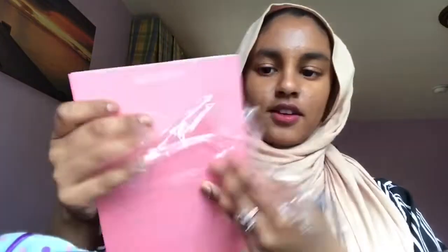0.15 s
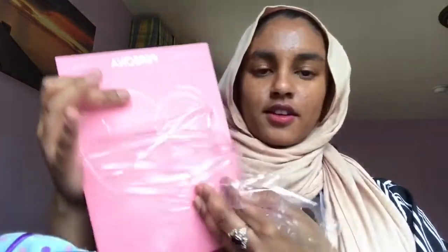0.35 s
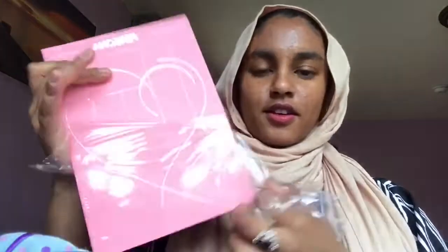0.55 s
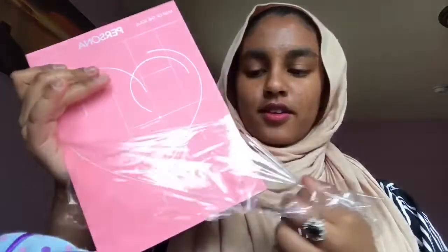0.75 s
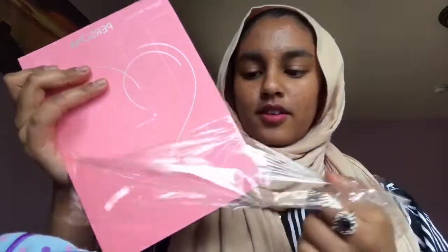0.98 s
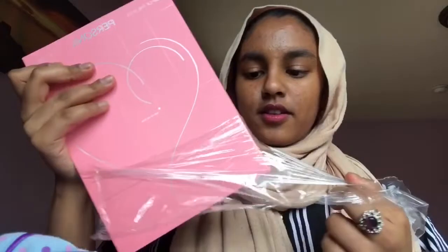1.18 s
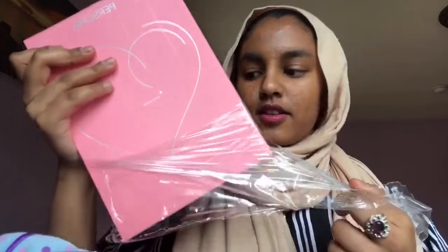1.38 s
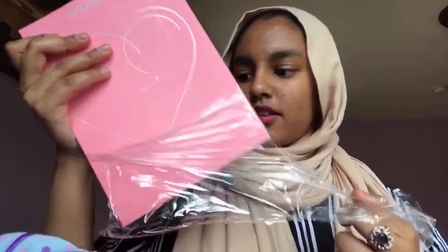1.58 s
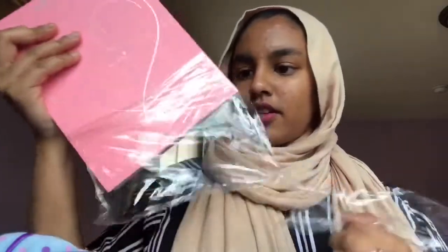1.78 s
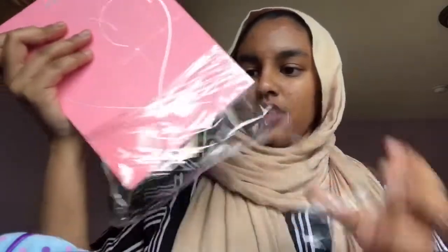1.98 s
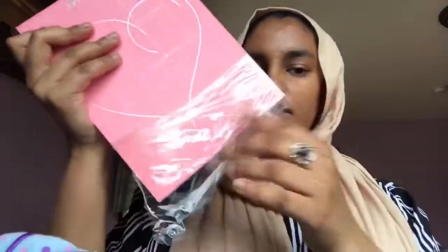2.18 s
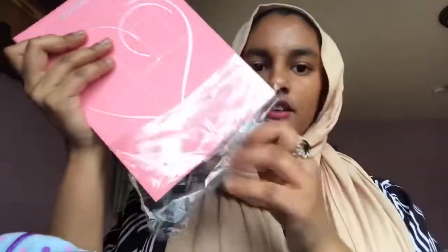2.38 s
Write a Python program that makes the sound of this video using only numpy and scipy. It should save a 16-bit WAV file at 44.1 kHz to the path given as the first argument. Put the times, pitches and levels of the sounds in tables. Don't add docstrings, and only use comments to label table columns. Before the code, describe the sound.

Plastic wrap being pulled from a card box, sharp crinkly snaps and fine crackle, close indoors

```python
import sys
import numpy as np
from scipy import signal
from scipy.fft import rfft, irfft
from scipy.io import wavfile
from scipy.ndimage import uniform_filter1d

SR = 44100
rng = np.random.default_rng(int(sys.argv[2]) if len(sys.argv) > 2 else 0)


def transcribe(signal):
    frames = np.atleast_2d(signal).T
    limited = np.clip(frames, -1, 1)
    pcm = np.round(limited * 32767).astype(np.int16)
    wavfile.write(sys.argv[1], SR, pcm)


def makeup_ratio(level_db):
    decades = np.asarray(level_db, float) / 20
    return 10 ** decades


N = 108045

SHIVER_S = 0.002


def evened(x):
    return x / np.sqrt(np.mean(x ** 2) + 1e-20)


def read(points, hz):
    point_hz, value = np.transpose(points)
    return np.interp(np.log(hz + 1), np.log(point_hz + 1), value)


def curve(table, column=1):
    rows = np.array(table)
    return np.interp(np.arange(N) / SR, rows[:, 0], rows[:, column])


def colour(x, points):
    hz = np.fft.rfftfreq(len(x), 1 / SR)
    return irfft(rfft(x) * makeup_ratio(read(points, hz)), len(x))


def resonate(x, hz, width_hz):
    turn = np.exp(2j * np.pi * np.cumsum(hz * np.ones(len(x))) / SR)
    r = np.exp(-np.pi * width_hz / SR)
    return 2 * (turn * signal.lfilter([1 - r], [1, -r], x / turn)).real


def drift(rate_hz):
    noise = rng.standard_normal(N + SR)
    pole = np.exp(-2 * np.pi * rate_hz / SR)
    return evened(signal.lfilter([1], [1, -pole], noise)[SR:])


def add(mix, start_s, sound):
    part = mix[round(start_s * SR):][:len(sound)]
    part += sound[:len(part)]


def slip_clock():
    t = np.arange(-.008, .03, 1 / SR)
    jump = 1. * (np.abs(t) == np.abs(t).min())
    return t, jump


def buckle(mix, at_s, rasp_db, rasp_s, sent_db, patch):
    t, jump = slip_clock()
    ring = np.zeros(len(t))
    for hz, width_hz, db in patch:
        late = np.roll(jump, round(.25 * SR / hz))
        ring += makeup_ratio(db) * resonate(resonate(late, hz, width_hz), hz, width_hz)

    lead = np.where(t < 0, 0.3, 1)
    shape = np.exp(-abs(t) / lead / rasp_s)
    shape += (t > 0) * makeup_ratio(-30) * np.exp(-abs(t) / SHIVER_S)
    bright = signal.butter(2, 2 * 3000 / SR, "high")
    rasp = signal.lfilter(*bright, rng.standard_normal(len(t))) * shape * makeup_ratio(rasp_db)
    near = ring + rasp
    add(mix[0], at_s + t[0], near)

    blurred = np.sqrt(abs(uniform_filter1d(abs(rfft(near)) ** 2, size=70)))
    add(mix[1], at_s + t[0], makeup_ratio(sent_db) * np.roll(irfft(blurred, len(t)), jump.argmax()))


def buckles(mix):
    # at_s, rasp_db, rasp_s, sent_to_walls_db
    events = [(0.1466, -61, 0.00081, -2), (0.2237, -23.5, .0004, 3), (0.272, -17.5, 0.00035, 0.5),
              (0.4575, -37, 0.0018, 6), (.8147, -35, 0.003, -6), (1.0366, -36, 0.0016, -4),
              (1.601, -26.5, 0.00043, -3.5), (1.6714, -17.5, 0.00016, -4), (1.977, -32, 0.0012, -10),
              (2.1436, -6.5, 0.00029, -2.5)]
    # pitch_hz, width_hz, level_db
    patches = [
        [(776, 330, -5.5), (1130, 270, -2.5), (2750, 760, -17.5), (3150, 880, -14)],
        [(820, 570, 3.5), (1460, 480, 5), (3880, 1200, -2), (8450, 2500, -10.5)],
        [(730, 560, 0), (1250, 460, 3.5), (2700, 1400, 3.5), (3650, 610, 7), (7500, 1600, -1),
         (14800, 1700, -6)],
        [(1280, 340, -11), (1810, 720, -15), (3580, 1200, -15), (14900, 1500, -16)],
        [(1140, 320, -11.5), (2700, 1200, -9), (5500, 1500, -10.5), (7500, 1000, -19)],
        [(620, 940, -5), (1070, 420, -16), (2200, 980, -12), (3150, 580, -19)],
        [(615, 420, 4), (1023, 330, 6), (2900, 650, -5), (4070, 1100, -11), (6500, 2900, -9.5)],
        [(740, 560, -2.5), (1120, 450, -0.5), (2070, 310, -3.5), (3500, 1500, -5.5), (7000, 3500, -2),
         (12000, 2200, -20)],
        [(685, 480, -4), (1990, 760, -10), (4640, 630, -3), (7060, 1700, -13.5), (11240, 1200, -13),
         (14500, 1200, -7)],
        [(910, 230, 13), (1330, 760, 15.5), (1810, 240, 5.5), (3500, 370, 3), (4460, 2100, 10.5),
         (5920, 590, 11), (8000, 2450, 7.5)],
    ]
    for event, patch in zip(events, patches):
        buckle(mix, *event, patch)


def voice(slips, box_db, box_hz, film_hz, flat_db):
    def ring(hz, width_hz):
        return evened(resonate(resonate(slips, hz, width_hz), hz, 3.1 * width_hz))

    film_width_hz, box_width_hz = 3200, 840
    film = ring(film_hz, film_width_hz) + makeup_ratio(flat_db) * evened(slips)
    film = film + makeup_ratio(-19) * ring(min(1.75 * film_hz, 15000), film_width_hz)
    box = ring(box_hz, box_width_hz)
    return film / abs(film).max() + makeup_ratio(box_db + 2.5) * box / abs(box).max()


def snap(mix, at_s, peak_db, box_db, box_hz, film_hz, small=False):
    t, jump = slip_clock()
    sharp_flat_db = -4
    spread, jump_size, flat_db = (4.0, .55, -5) if small else (1, 1, sharp_flat_db)
    rise_s, fall_s, lag_s = .00028, .00022, .0017

    shape = 0.69 * np.exp(-abs(t) / np.where(t < 0, rise_s, fall_s) / spread)
    shape = shape + (t > 0) * makeup_ratio(-16.5) * np.exp(-abs(t) / SHIVER_S)
    slips = shape * rng.standard_normal(len(t)) + jump_size * jump
    near = voice(slips, box_db, box_hz, film_hz, flat_db)
    near = makeup_ratio(peak_db) * near / abs(near).max()

    sent = makeup_ratio(-4.5 * np.log2(film_hz / 4600)) * near.std()
    start_s = max(at_s + lag_s + t[0], 0)
    add(mix[0], start_s, near)
    add(mix[1], start_s, sent * evened(voice(jump, box_db, box_hz, film_hz, sharp_flat_db)))


def creases(mix):
    # at_s, peak_db, box_share_db, box_pitch_hz, film_pitch_hz
    bright_tuft = [(1.031, -28, -7.5, 660, 8950)]
    # at_s, peak_db, box_share_db, film_pitch_hz
    small_creases = [(.006, -38.5, -9, 3000), (0.022, -44, -38, 6500), (0.0427, -40.5, -40, 3240),
                     (0.05, -40.5, -21, 2470), (.059, -44, -19, 4240), (.088, -44, -8, 2980),
                     (0.0485, -40, 10, 2690), (0.1267, -46, 5, 2790), (0.193, -39, 10, 2180),
            (0.2285, -48, -7, 2700), (0.4977, -41, -38, 4500), (0.5595, -34, -39, 3880),
            (0.5842, -35.5, -8.5, 3900), (0.6443, -38.5, -42, 8450), (0.673, -41, -21, 2370),
            (0.7226, -49, -28, 2290), (0.771, -35, -38, 8100), (0.7918, -39, -37, 3070),
            (0.84, -49, -13, 2440), (0.852, -32, -9.5, 10300), (0.9166, -59, -18, 2630),
            (0.939, -39.5, -27, 5900), (0.9585, -38, -18, 2270), (0.975, -39, -12, 2680),
            (1.0088, -35, -5, 3000), (1.1046, -40.5, -26, 2060), (1.1276, -34.5, -12, 2340),
            (1.1388, -38.5, 2, 4900), (1.1465, -36, -12, 2000),
                     (.2045, -43, -22, 6000), (.2115, -41, -12, 2300), (.2472, -38, -20, 4000),
              (1.0154, -34, -10, 2500), (1.567, -39, -26, 7500), (1.5855, -37, -18, 4000),
              (1.6447, -38, -20, 7700), (1.956, -43, -10, 2500), (2.1036, -40, -22, 7000),
              (2.1196, -36, -10, 4600),
                     (1.262, -41, -2, 5500), (1.321, -42, -18, 6700), (1.3961, -42.5, -11, 2460),
            (1.4668, -45, -17, 8760), (1.4755, -44, -12, 7500), (1.553, -42, -26, 2360),
            (1.5614, -39.5, -20, 7360), (1.7243, -38, -10.5, 4480), (1.7996, -44, -18, 3200),
            (1.934, -69, -2, 2440), (2.07, -45.5, -5, 2810), (2.2287, -39, -22, 6600),
            (2.2968, -43.5, -14, 2230), (2.4143, -48, -30, 6500)]
    # at_s, peak_db, box_share_db, film_pitch_hz
    ticks = [(0.2758, -23.5, -25, 5500), (0.4562, -39, -26, 9000), (0.4609, -36.5, -11, 3500),
             (0.6537, -44, -40, 8000), (.691, -37, -9, 7500), (0.949, -46, -8, 2600),
             (0.968, -44, -10, 2600), (0.994, -44, -17, 3000), (1.022, -33, -8, 2420),
             (1.043, -50, -8, 2600), (1.456, -45, -30, 3000), (1.52, -50, -40, 6500),
             (1.808, -40.5, -40, 5500), (1.858, -47, -13, 2450), (0.264, -31, -23, 7500),
             (1.011, -36, -10, 2900), (1.292, -38, 4, 2200), (1.908, -44, -4, 3500),
             (2.1365, -30, -11, 2500), (2.139, -29, -23, 7000)]
    box_hz = 1030
    for row in bright_tuft:
        snap(mix, *row, small=True)
    for at_s, peak_db, box_db, film_hz in small_creases:
        snap(mix, at_s, peak_db, box_db, box_hz, film_hz, small=True)
    for at_s, peak_db, box_db, film_hz in ticks:
        snap(mix, at_s, peak_db, box_db, box_hz, film_hz)


def crackle():
    # time_s, crackle_level_db
    pull = [(0, -57), (.07, -67), (.12, -66.5), (.19, -61), (.23, -50), (.46, -58.5), (.62, -58.5),
            (.8, -50.5), (.89, -54), (.96, -48.5), (1.04, -49.5), (1.07, -59.5), (1.15, -53.5),
            (1.42, -61.5), (1.62, -59.5), (1.9, -65), (2.1, -54), (2.33, -67)]
    # pitch_hz, level_db
    film_tone = [(300, -12.5), (1100, -7.5), (1600, -10), (2300, -8), (4000, -11.5), (9000, -10.5),
                 (15500, -10)]
    creases_per_s, spread_db, clump_db, grain_s = 1300, 3.2, 2.5, .0005

    size = makeup_ratio(spread_db * np.minimum(rng.exponential(1, N), 3.5) + clump_db * drift(41))
    size *= rng.random(N) < creases_per_s / SR
    size *= rng.choice([-1., 1.], N)
    patch = rng.integers(0, 32, N)
    t = np.arange(120) / SR
    out = np.zeros(N)
    for k, hz in enumerate(np.geomspace(700, 15000, num=32)):
        rasp = rng.standard_normal(len(t)) * np.exp(-t / grain_s)
        rasp = evened(resonate(rasp, hz, 2.5 * hz)) + makeup_ratio(10) * evened(rasp)
        out += signal.oaconvolve(size * (patch == k), rasp)[:N]
    return makeup_ratio(curve(pull) + 0.5) * evened(colour(out, film_tone))


def knocks(mix):
    # at_s, peak_db, pitch_hz
    bumps = [(0.226, -33, 310), (0.2303, -42, 1460), (0.961, -41.5, 530), (1.148, -45, 584),
             (1.2928, -36.5, 546), (1.9105, -42.5, 820), (1.978, -40.5, 307), (2.141, -28, 137),
             (2.146, -35.5, 310)]
    for at_s, peak_db, hz in bumps:
        turns = np.arange(0, .08, 1 / SR) * hz
        thud = makeup_ratio(peak_db) * np.sin(2 * np.pi * turns) * np.exp(-2 * turns / 2.75)
        add(mix.T, at_s, thud[:, None])


def room():
    # pitch_hz, t60_s
    decay = [(200, 0.33), (1000, 0.25), (4000, 0.22), (9000, 0.22), (16000, 0.27)]
    # delay_s, level_db
    echoes = [(.0016, -25.5), (.0034, -11), (.0049, -17.5), (.0072, -20), (.012, -26)]
    taps = np.zeros(SR // 2)
    at = np.arange(120, len(taps) - 12, 12)
    taps[at + rng.integers(0, 12, len(at))] = rng.choice([-1., 1.], len(at))

    hz, t, bands = signal.stft(taps, SR, nperseg=256)
    fade = makeup_ratio(-60 * t / read(decay, hz)[:, None])
    tail = signal.istft(bands * fade, SR, nperseg=256)[1]
    tail *= makeup_ratio(-6.5) / np.linalg.norm(tail)
    for k, (delay_s, db) in enumerate(echoes):
        tail[round(delay_s * SR)] += (-1) ** k * makeup_ratio(db)
    return tail


def rumble():
    # time_s, level_db, pitch_hz
    path = [(0.0, -57, 49.4), (0.13, -44.5, 47.3), (0.2, -49.5, 52.6), (0.27, -35.5, 58.7),
            (0.54, -39, 50.4), (0.64, -38, 59.5), (0.8, -42.5, 55.6), (0.9, -44, 50.2), (1.03, -42.5, 55.7),
            (1.13, -39, 49), (1.16, -47, 57.2), (1.6, -36.5, 63.1), (1.97, -43.5, 53.7), (2.07, -43, 56.6),
            (2.16, -33.5, 55), (2.2, -48, 52), (2.31, -55.5, 59.2), (2.45, -41, 52)]
    hz, width_hz = curve(path, column=2), 11.1
    drone = resonate(resonate(rng.standard_normal(N), hz, width_hz), hz, width_hz)
    drone /= np.sqrt(abs(uniform_filter1d(drone ** 2, size=5000)) + 0.059 * np.mean(drone ** 2))
    return makeup_ratio(curve(path)) * drone


def mains_hum():
    # pitch_hz, level_db
    harmonics = [(49, -54), (99, -51), (150, -54.5), (192, -62)]
    t = np.arange(N) / SR
    hum = np.zeros(N)
    for hz, db in harmonics:
        tone = np.sin(2 * np.pi * (hz * t + rng.random()))
        waver = 0.29 * evened(resonate(rng.standard_normal(N), hz, 11.7))
        hum += makeup_ratio(db) * evened(tone + waver)
    return hum


def still_air():
    # pitch_hz, level_db
    air_tone = [(20, -13), (60, 4.5), (110, -1.5), (200, -7), (450, -30.5), (1600, -29), (3000, -44.5),
                (16000, -45)]
    return makeup_ratio(-48) * evened(colour(rng.standard_normal(N), air_tone))


def scene():
    film = np.zeros((2, N))
    buckles(film)
    creases(film)
    knocks(film)
    film += crackle()
    echo = signal.fftconvolve(film[1], room())[:N]
    house = rumble() + mains_hum() + still_air()
    return (film[0] + echo + house)[None]


def roll_off(x):
    return signal.sosfilt(signal.butter(12, 16990, fs=SR, output="sos"), x)


def record(dry):
    # pitch_hz, level_db
    overall_tone = [(20, -0.5), (9000, 0.5), (9800, -2), (12400, 0.5), (12900, -12), (13400, -2), (15800, -1.5),
                    (16000, -30)]
    mixed = colour(dry[0], overall_tone)[None]
    return roll_off(mixed)


dry = scene()
out = record(dry)
transcribe(out)
```